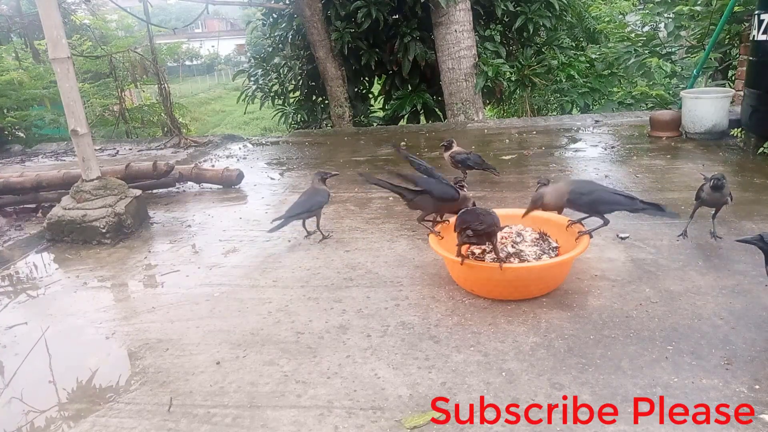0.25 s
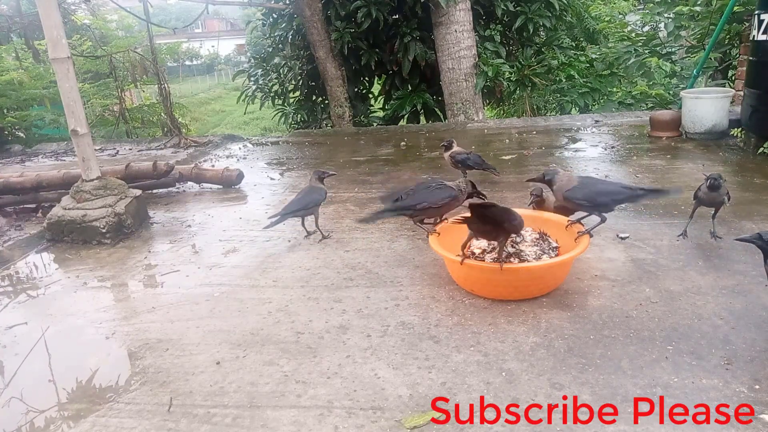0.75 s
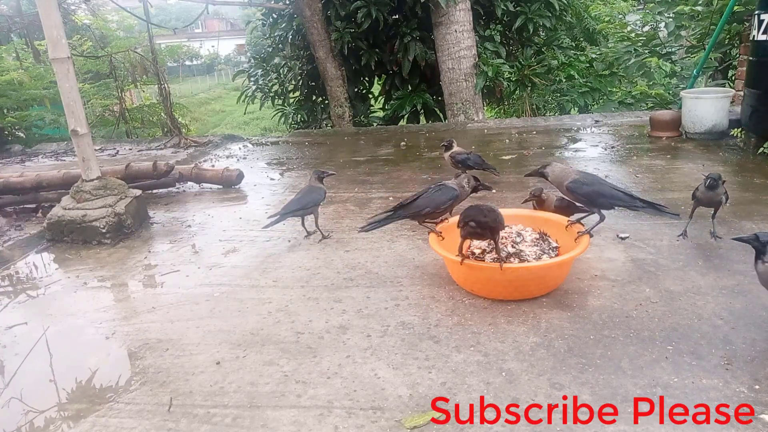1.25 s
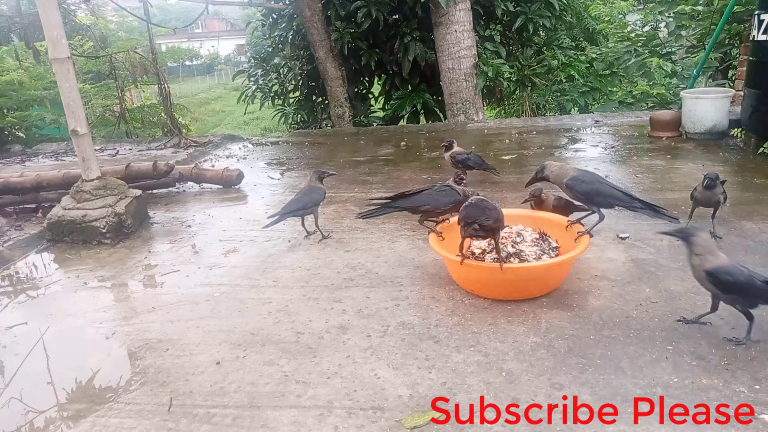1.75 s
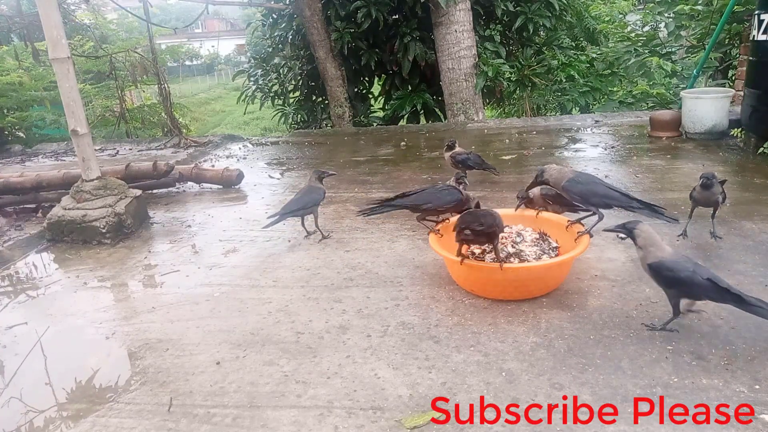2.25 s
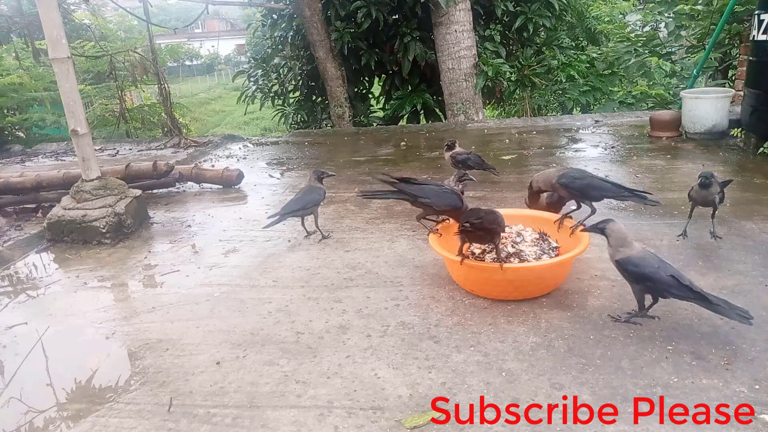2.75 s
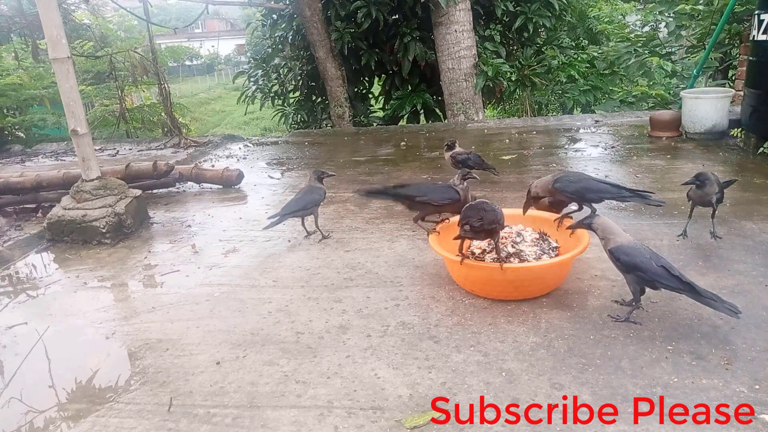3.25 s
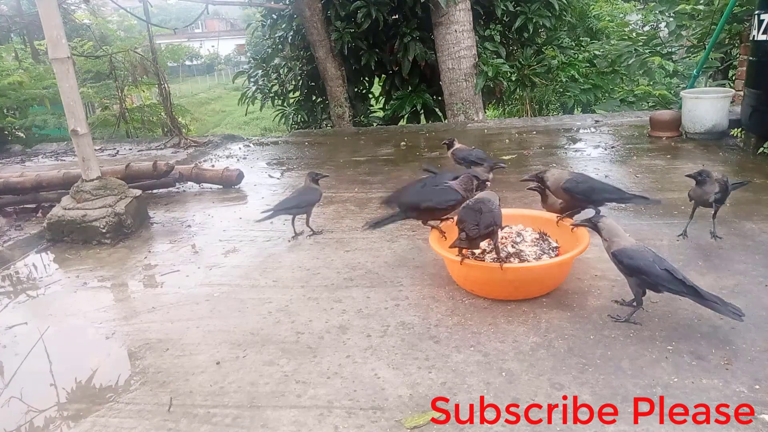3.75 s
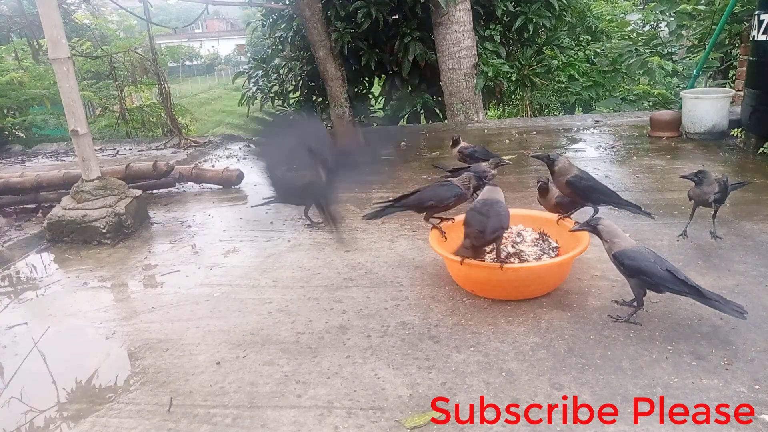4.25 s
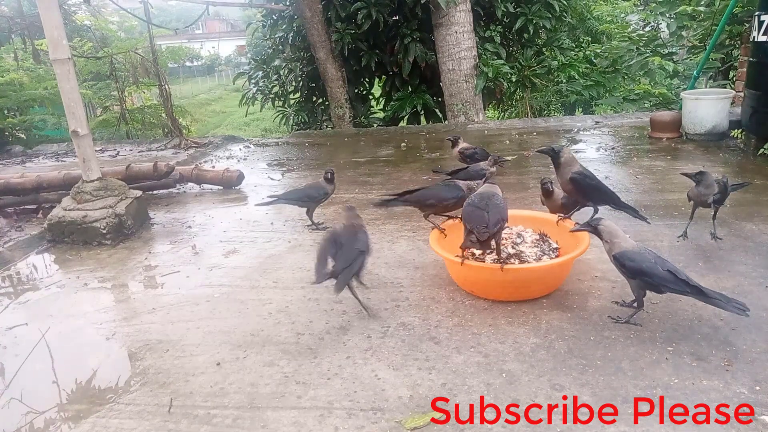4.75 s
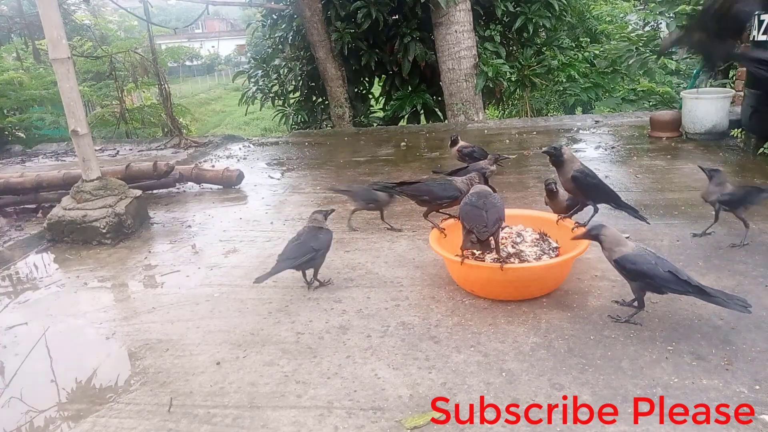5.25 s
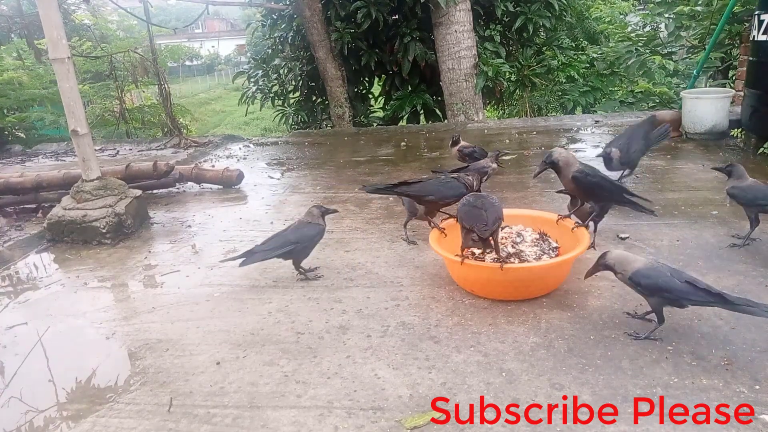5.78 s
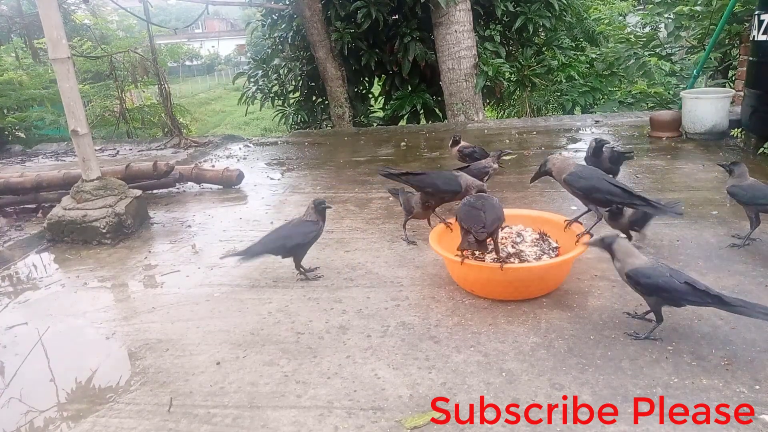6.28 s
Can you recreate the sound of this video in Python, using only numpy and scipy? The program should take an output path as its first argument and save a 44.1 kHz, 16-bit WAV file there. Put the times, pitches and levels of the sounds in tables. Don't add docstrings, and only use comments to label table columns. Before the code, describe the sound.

A small microphone sits close to crows feeding from a plastic basin in a wet, open yard. Soft leafy hush, far traffic, a very faint low motor hum and thin insect shimmer run throughout, with distant chirping. A far caw comes at 0.15 s, then at 0.55-1.05 s a loud, harsh near caw rises fast, holds and drops, its tone changing late as the head turns. A much quieter, duller caw answers at 1.3-1.7 s; a higher, tighter one at 2.5-2.8 s. Light beak and claw ticks scatter between, with a clear songbird note at 1.15 s. Sharp clacks and a scrape land at 3.6 s as wings swish about six times a second. From 4.6 to 5.1 s heavy low gusts thump and flutter on the microphone, then weaker puffs until about 5.8 s. Far caws recur, notably at 5.8 s; final small pecks fade into hush by 6.5 s.

```python
import sys
import numpy as np
from scipy import signal
from scipy.fft import rfft, irfft
from scipy.io import wavfile
from scipy.ndimage import uniform_filter1d

SR = 44100
rng = np.random.default_rng(int(sys.argv[2]) if len(sys.argv) > 2 else 0)


def waveform_to_disk(signal):
    frames = np.transpose(np.atleast_2d(signal))
    scaled = np.clip(frames, -1, 1) * 32767
    samples = np.round(scaled).astype(np.int16)
    wavfile.write(sys.argv[1], SR, samples)


def invert_db(x):
    u = np.asarray(x, float) / 20
    return 10 ** u


N = 287532

# (time [s], effort [dB], pitch [Hz], rasp [0-1])
LOUD_CAW = [(.55, -38.5, 257.7, 1), (.59, -22.5, 390, 0.9), (.655, -19.5, 490, 0.98),
            (.695, -18, 504.5, 0.68), (.785, -18.5, 498.1, 0.74), (.81, -19.5, 485.2, 0.7),
            (.868, -20.5, 481.9, 0.93), (.92, -21.5, 427.8, 0.4), (1.0, -24, 386.7, 0.32),
            (1.027, -33.5, 302.9, 1), (1.065, -72, 161.2, 0.77)]
DULL_CAW = [(1.265, -52, 370, 0.84), (1.29, -38.5, 422, 0.92), (1.35, -34, 464.8, 0.94),
            (1.45, -35.5, 450, 1), (1.54, -36.5, 402.8, 1), (1.66, -42.5, 349.7, 0.92),
            (1.69, -47, 317, 0.96), (1.71, -69, 315, 0.48)]
HIGH_CAW = [(2.482, -43, 332, 0.53), (2.506, -34, 462, 0.8), (2.535, -28.5, 568.7, 0.89),
            (2.59, -30, 573.5, 1), (2.62, -26, 560.3, 0.83), (2.665, -28.5, 548.8, 0.83),
            (2.7, -24.5, 513.3, 0.24), (2.724, -29, 502.3, 0.074), (2.741, -35, 495.4, 0.065),
            (2.778, -26, 466.6, 0.3), (2.79, -35.5, 450, 0.31), (2.81, -37.5, 368.5, 0.45),
            (2.834, -45.5, 290, 0.12)]
# (frequency [Hz], level [dB])
LOUD_THROAT = [(200, 4.5), (500, -13), (950, -37.5), (1150, -20.5), (1450, -10), (1720, -5), (2030, 3),
               (2400, 0), (2850, -16.5), (3100, -17.5), (3350, -27.5), (3700, -14), (4120, -15),
               (4900, -26), (5700, -19.5), (6300, -29), (7200, -28.5), (7900, -36.5), (8450, -33.5),
               (9300, -40.5), (10200, -39), (11000, -44), (15800, -46)]
DULL_THROAT = [(180, -64), (300, -9), (439, -41), (592, -42), (900, -17.5), (1120, -11), (1350, -11.5),
               (1600, -9.5), (1850, -6), (2060, -8.5), (2330, -3.5), (2700, -17.5), (3210, -29.5),
               (3790, -35.5), (4250, -40), (4750, -32), (5150, -36), (5600, -30.5), (6200, -36),
               (6800, -35.5), (7490, -37), (11300, -48), (15800, -57)]
HIGH_THROAT = [(180, -52), (300, -30), (527, 17), (747, -18), (1150, -11), (1630, -8), (1950, 8), (2250, 0),
               (2860, -19), (3430, -12), (4050, -39), (4650, -25.5), (5050, -29), (5500, -23), (6300, -29),
               (7050, -17.5), (7500, -23.5), (8000, -29), (10000, -33), (11500, -39), (15800, -46)]
FAR_THROAT = [(300, -45), (950, -7), (1500, -2), (1850, 7), (2100, 7), (2480, -1), (3000, -15), (3500, -17),
              (6000, -36), (11000, -48)]
ROUGHNESS = [.06, .05, .035]
SWINGS = [.095, .075, .058]
# (pitch [Hz], free rate [Hz])
THROB_LOCKS = [
    (494, 85.5),
    (600, 79.65),
    (562, 83.3),
]
# (frequency [Hz], level [dB])
BREATH_COLOUR = [(700, -32), (1500, -14), (3000, -13.5), (4300, 3.5), (6000, 13)]
# (frequency [Hz], change [dB])
NARROW_BEAK = [(2500, 0), (3900, -2), (5200, 0), (7200, 6), (8600, 4), (11000, 2)]
# (start [s], end [s])
BEAK_WIDENS_S = (.64, .7)
# (frequency [Hz], change [dB])
HEAD_TURN = [(1500, 3), (2000, 0.5), (2450, 4.5), (2900, 13), (3200, 4.5), (3550, -4.5), (4000, -14),
             (4900, 7), (7000, 2), (14500, 10)]
# (start [s], end [s])
HEAD_TURN_S = (.865, .9)
# (time [s], length [s], first pitch [Hz], top pitch [Hz], last pitch [Hz], level [dB])
FAR_CAWS = [(0.145, 0.16, 404.5, 451, 422, -56.5), (1.943, 0.6, 387, 408.7, 491.4, -59),
            (3.222, 0.24, 450, 534, 455, -56.5), (4.335, 0.28, 420, 478, 422, -60),
            (4.781, 0.19, 440, 489, 460, -58.5), (5.78, 0.22, 440, 515.5, 472.5, -54)]
# (time [s], peak [dB], ring [Hz], knock re ring [dB], fizz re ring [dB])
TICKS = [(.0462, -33, 1730, -21, -30), (.541, -37, 1400, -13, -40), (2.178, -48, 4350, -30, -30),
         (0.0299, -36, 3280, -13, -12), (0.0449, -26, 3750, -30, -35), (2.656, -39.5, 980, 2.5, -30),
         (1.156, -27.5, 3820, -35, -9), (1.1717, -32, 3930, -11.5, -6.5), (2.397, -37.5, 2620, -15, 0),
         (2.403, -34.5, 3030, -15, -6), (2.865, -46, 9300, -23, -8), (3.8492, -29.5, 4050, -27, -9),
         (3.879, -32, 3500, -17, -2), (4.4849, -41, 2500, -19, -2), (4.7533, -36, 3500, -12, -2),
         (5.3608, -39, 1190, -7, -6), (5.706, -47, 9000, -31, 6), (5.715, -51, 9000, -20, 2),
         (3.489, -42, 3920, 2.5, -30), (3.32, -41, 2130, -20, -30), (3.467, -28.5, 3520, -25, -33),
         (3.6103, -20, 3860, 3, -6), (3.622, -20.5, 1890, -1, -29), (3.7902, -33, 1970, -10, -38),
         (3.8857, -23, 2950, -34, -3.5), (4.7725, -30, 4170, -4, -8.5), (4.4923, -31.5, 2100, -21, 0),
         (2.603, -43.5, 910, 8, -30), (4.9112, -31, 1440, -5, -19), (5.1532, -26.5, 2150, -24, -8),
         (5.4077, -36.5, 910, 1.5, -20), (5.691, -48.5, 3700, -30, 10), (6.1521, -46, 1260, 5, 0),
         (6.2706, -45.5, 3340, 7.5, 5), (6.3904, -39.5, 3120, -9, 4), (6.408, -31.5, 3550, -23, -2),
         (6.4873, -34.5, 3340, 2.5, -0.5), (6.506, -32, 2210, -6, -7)]
# (time [s], level [dB], 60 dB decay [s])
SCUFFS = [(3.626, -37.5, 0.046), (4.462, -48, 0.14), (4.91, -47, 0.47), (5.153, -40, 0.28),
          (5.405, -49, 0.43), (3.32, -62, 0.075)]
# (first stroke [s], gap [s])
FLIGHTS = [(3.527, 0.1662), (4.898, 0.1663)]
STROKES_DB = [
    [-55, -55.5, -53.5, -55, -58, -58.5, -56.5, -56.5],
    [-54.5, -58.5, -53.5, -55.5, -56.5, -61],
]
# (frequency [Hz], level [dB])
FEATHERS = [(180, -43), (300, -3.5), (676, -11.5), (747, -8), (1040, -20), (1170, -19), (2630, -13),
            (4630, -20), (7010, -19.5), (9610, -29.5), (15800, -35.5)]
# (middle [s], level [dB], length [s])
GUSTS = [(4.55, -50, 0.06), (4.62, -31, 0.044), (4.68, -22.5, 0.17), (4.77, -21.5, 0.075),
         (4.84, -18.5, 0.061), (4.96, -18.5, 0.12), (5.025, -25.5, 0.041), (5.09, -34, 0.096),
         (5.235, -31.5, 0.082), (5.295, -27, 0.063), (5.38, -33, 0.091), (5.5, -31.5, 0.063),
         (5.56, -32, 0.036), (5.63, -34, 0.037), (5.75, -38.5, 0.15), (5.93, -53, 0.22),
         (6.155, -36.5, 0.054), (6.44, -48.5, 0.28)]
# (frequency [Hz], level [dB])
BUFFET = [(15, -48), (25, -35), (80, 7.5), (183, -3.5), (258, -22.5), (469, -46), (800, -59), (1200, -62),
          (1560, -81), (2640, -120)]
FLUTTER = [(60, -29), (150, 5.5), (300, -7.5), (500, -20.5), (900, -50), (2000, -96)]
# (time [s], peak [dB], frequency [Hz], polarity and scale)
THUMPS = [(1.246, -41, 84.6, 1), (3.286, -41, 326, .8), (2.149, -39, 370, 0.77), (3.268, -35.5, 71.4, 0.62),
          (4.602, -31, 250, 0.84), (4.756, -21, 257, 0.67), (4.667, -13, 197, 0.76),
          (4.711, -21, 296, -1.13), (4.768, -22.5, 200, 0.95), (4.813, -9.5, 202, -0.82),
          (4.832, -3, 139, -0.56), (4.916, -12, 170, -0.62), (4.945, -4, 315, 0.51), (5.036, -8, 180, 0.62),
          (5.292, -19, 146, 0.9)]
# (time [s], length [s], first pitch [Hz], last pitch [Hz], level [dB])
CHIRPS = [(.48, .066, 3030, 3130, -58), (.45, .04, 3300, 3900, -60), (.475, .075, 3850, 3860, -63),
          (.22, .09, 2720, 2700, -63), (.4, .05, 2550, 2700, -64), (1.147, .046, 2885, 2975, -36.5),
          (1.19, .075, 2957, 2910, -51), (1.755, .04, 3510, 3450, -59), (2.04, .06, 3300, 4600, -62),
          (2.121, .052, 3270, 3030, -58), (2.23, .05, 4800, 3900, -63), (2.275, .035, 3450, 3050, -57),
          (2.314, .095, 2730, 2600, -61), (3.555, .062, 2720, 2900, -51), (3.661, .025, 2380, 2300, -49),
          (3.794, .04, 1944, 1734, -52.5), (3.83, .059, 2450, 3160, -41.5), (3.82, .02, 1750, 2500, -51),
          (3.902, .098, 2950, 1940, -54), (3.996, .07, 1980, 2070, -59), (4.092, .09, 2600, 3190, -61),
          (4.235, .05, 4300, 4270, -65), (4.29, .2, 4190, 4260, -57), (4.49, .14, 4250, 4190, -62),
          (4.329, .053, 2450, 3150, -61), (4.584, .028, 2255, 2860, -59), (4.57, .09, 2250, 2330, -64),
          (4.627, .1, 2960, 2920, -60), (4.664, .085, 2680, 2290, -61), (4.767, .05, 3064, 2950, -57),
          (4.83, .035, 2950, 2850, -60), (4.84, .05, 3740, 3660, -61), (4.91, .022, 1545, 1400, -49),
          (4.973, .035, 3610, 3300, -60), (5.0, .09, 4270, 4280, -60), (3.145, .04, 3480, 3450, -62),
          (5.09, .07, 4270, 4220, -63), (5.304, .047, 3510, 3100, -54), (5.468, .044, 2360, 2690, -63),
          (5.66, .06, 3300, 3750, -62), (5.769, .045, 2400, 2850, -59), (5.82, .04, 2850, 3350, -63),
          (5.99, .07, 3500, 3450, -65)]
# (frequency [Hz], level [dB])
HUSH_COLOUR = [(15, -53), (25, -44), (102, 1), (170, -11), (205, -6.5), (228, -8.5), (486, -15),
               (672, -19.5), (1320, -21), (2150, -20), (3580, -21.5), (4210, -28.5), (4700, -28),
               (5300, -25), (8970, -39.5), (15800, -35)]
# (time [s], change [dB])
BREEZE = [(0, 0), (.4, -1.5), (1.1, 1), (1.8, -1), (2.2, 1), (2.9, -0.5), (3.1, -2.5), (3.401, 1), (3.9, 3),
          (4.2, 0.5), (4.6, 4.5), (5.2, 1), (5.6, -1), (6.0, -1), (6.52, 0)]
# (frequency [Hz], rms [dB])
HUM = [(102.3, -67.5), (204.6, -62), (333.8, -93)]
# (frequency [Hz], width [Hz], level [dB], throb rate [Hz], throb depth [dB])
INSECTS = [(5530, 204, -72.5, 11, 3), (8840, 600, -77, 3., 0.4)]
# (frequency [Hz], level [dB])
MICROPHONE = [(20, -11.5), (60, 0.5), (4300, 1.5), (5000, -2.5), (5600, -3.5), (6300, -2), (7200, 6),
              (8200, 2.5), (11000, 3.5), (12800, 3.5), (14500, 12), (15500, 12), (15750, -57), (22050, -70)]


def evened(x):
    return x / np.sqrt(np.mean(x ** 2) + 1e-20)


def read(points, hz):
    f, value = np.transpose(points)
    return np.interp(np.log(hz + 1), np.log(f + 1), value)


def add(mix, s, sound):
    part = mix[max(round(s * SR), 0):][:len(sound)]
    part += sound[:len(part)]


def coloured(x, spectrum):
    gain = invert_db(read(spectrum, np.fft.rfftfreq(len(x), 1 / SR)))
    return evened(irfft(rfft(x) * gain, len(x)))


def wander(size, hz):
    lowpass = signal.butter(2, min(hz / (SR / 2), .9))
    return evened(signal.lfilter(*lowpass, rng.standard_normal(size + 4000))[4000:])


def lumps(rows):
    t = np.arange(N) / SR
    return sum(invert_db(db) * np.exp(-((t - s) / (0.5 * length)) ** 2) for s, db, length in rows)


def caw(rows, throat, count_locked, lock, rough_top, odd_db, mouth_open=0.98, swing=0.15, first_db=-9.0,
        second_db=-1.5, breath_db=0.5, sag_db=19.5, pulse=0.48, patchy_db=3.5, count=36):
    s, *columns = np.transpose(rows)
    t = np.arange(s[0], s[-1], 1 / SR)
    size = len(t)
    effort_db, hz, rasp = (np.interp(t, s, c) for c in columns)
    turned = np.interp(t, [*HEAD_TURN_S, 1.1, 1.2], [0, 1, 1, 0])
    opening = np.interp(t, [.5, .55, *BEAK_WIDENS_S], [0, 1, 1, 0])

    falling = np.where(t > t[hz.argmax()], 1, .45)
    under_db = effort_db.max() - effort_db
    lock_hz, free_hz = lock
    locked = hz > lock_hz
    slack = np.minimum(under_db / 16, 1) ** 2
    rough = rough_top * rasp * (2 - locked) + .15 * slack + 0.2 * turned
    mouth = mouth_open - .01 * np.maximum(under_db - 8.5, 0)

    hz = hz * (1 + .03 * rough * wander(size, 35.3))
    throb = 2 * np.pi * np.cumsum(np.where(locked, hz / count_locked, free_hz)) / SR
    shake = hz * rasp * swing * (np.sin(throb) + 0.14 * np.cos(2 * throb + 0.19))
    hz = hz * (1 + .04 * (rough + .012) * wander(size, 360))
    turns, shaken = np.cumsum(hz) / SR, np.cumsum(shake) / SR

    tone = np.zeros(size)
    for k in range(1, count):
        shimmer = 1 + (rough + .007 * k) * wander(size, 210)
        high = k / 7
        follows = k / np.sqrt(1 + high ** 4.2)
        level_db = read(throat, (k * hz + follows * shake) / mouth) + first_db * (k == 1)
        level_db += turned * read(HEAD_TURN, k * hz) + opening * read(NARROW_BEAK, k * hz)
        level_db += odd_db * rasp * (k % 2) / (1 + high ** 4)
        level_db -= 2 * np.maximum(k * hz - 10000, 0) / 1000
        level_db += patchy_db * rasp * wander(size, 22)
        if k == 2:
            level_db += second_db + sag_db * falling * np.minimum(np.log2(500 / hz), .45)
            shimmer *= 1 + pulse * rasp * np.cos(throb + 5.26)
        phase = 2 * np.pi * (k * turns + follows * shaken) + k * k * 0.44
        tone += invert_db(level_db) * shimmer * np.cos(phase)

    puffs = (1.0 + np.cos(np.pi * turns) ** 2) * rng.standard_normal(size)
    breath = coloured(coloured(puffs, throat), BREATH_COLOUR)
    breath += opening * (coloured(breath, NARROW_BEAK) - breath)
    voice = evened(tone) + invert_db(breath_db - 0.26 * under_db) * (.14 + 2.2 * rough) * breath
    voice *= 1 + 0.25 * rasp * np.cos(throb + .5)
    voice /= np.sqrt(uniform_filter1d(voice ** 2, 1600) + 1e-9)
    return s[0], invert_db(effort_db) * voice * signal.windows.tukey(size, .03)


def far_caw(s, length, first_hz, top_hz, last_hz, db):
    rasp = .65
    rows = [(s, db - 5.5, first_hz, rasp),
            (s + .27 * length, db, top_hz, rasp),
            (s + .8 * length, db - 1.5, (top_hz + last_hz) / 2, rasp),
            (s + length, db - 5.5, last_hz, rasp)]
    return caw(rows, FAR_THROAT, 6.3, THROB_LOCKS[1], .12, -3., mouth_open=(top_hz + last_hz) / 980,
               swing=.075, breath_db=-5., count=12)


def tick(s, db, ring_hz, knock_db, fizz_db):
    t = np.arange(round(.15 * SR)) / SR

    def mode(hz, t60):
        return np.sin(2 * np.pi * hz * t) * invert_db(-60 * t / t60)

    ring = mode(ring_hz, 0.0091)
    knock = invert_db(knock_db) * (mode(520, 0.035) + mode(300, 0.011) + 0.45 * mode(395, 0.047))
    noise = rng.standard_normal((2, len(t)))
    fizz = coloured(noise[0], [(4000, -8.5), (8000, -11.5), (16000, -24.5)])
    fizz *= invert_db(fizz_db - 60 * t / 0.012)
    grit = coloured(noise[1], [(300, -1.0), (800, -2.0), (3500, 0.0), (7000, -10.0), (16000, -32.5)])
    grit *= 0.22 * invert_db(-60 * t / 0.052)
    return s, invert_db(db - 2.5) * (ring + knock + fizz + grit) * np.minimum(t / 0.0013, 1)


def scuff(s, db, t60):
    t = np.arange(round(.3 * SR)) / SR
    grit = rng.standard_normal(len(t)) * invert_db(1.2 * wander(len(t), 130))
    colour = [(300, 4.5), (700, 5.5), (2500, -2.5), (4000, -10.5), (6000, -51), (16000, -29)]
    return s, invert_db(db - 60 * t / t60) * coloured(grit, colour)


def wings():
    strokes = []
    for (s, gap), strokes_db in zip(FLIGHTS, STROKES_DB):
        strokes += [(s + k * gap, db, 0.13) for k, db in enumerate(strokes_db)]
    rush = coloured(rng.standard_normal(N), FEATHERS)
    return lumps(strokes) * rush * invert_db(1.9 * wander(N, 67))


def wind():
    gust = lumps(GUSTS) * invert_db(2.0 * np.clip(wander(N, 32.0), -3, 1.3))
    out = invert_db(-3.5) * gust * coloured(rng.standard_normal(N), BUFFET)
    out += invert_db(8.0) * gust ** 1.795 * coloured(rng.standard_normal(N), FLUTTER)
    for s, db, hz, sign in THUMPS:
        u = np.arange(-.02, .02, 1 / SR) * hz * np.pi
        add(out, s - .02, sign * invert_db(db) * (1 - 2 * u ** 2) * np.exp(-u ** 2))
    return out


def chirp(s, length, first_hz, last_hz, db):
    size = round(length * SR)
    smear_hz = 40 + .1 * abs(last_hz - first_hz)
    whistle = np.exp(2j * np.pi * np.cumsum(np.linspace(first_hz, last_hz, size)) / SR)
    blur = 1.2 + wander(size, smear_hz) + 1j * wander(size, smear_hz)
    return s, invert_db(db) * evened((whistle * blur).real) * signal.windows.tukey(size, .4)


def chatter():
    out = np.zeros(N)
    for when, pitch, glide, length, level in rng.random((120, 5)):
        hz = 2300 + 1400 * pitch
        last_hz = hz * (.85 + .3 * glide)
        add(out, *chirp(when * N / SR, .03 + .07 * length, hz, last_hz, -77. + 4. * level))
    return out


def yard(x):
    at = np.arange(400, SR // 2, 20)
    walls = invert_db(-60 * at / SR / 0.15)
    trees = invert_db(-22 - 60 * at / SR / 0.75)
    taps = np.zeros(SR // 2 + 20)
    taps[at + rng.integers(0, 20, len(at))] = rng.choice([-1., 1.], len(at)) * (walls + trees)
    taps = coloured(taps, [(300, -6.5), (1500, 1.0), (3000, -0.5), (8000, 0), (16000, -13.5)])
    return signal.fftconvolve(x, taps / np.linalg.norm(taps))[:N]


def hush():
    frames, hz = N // 256 + 5, np.fft.rfftfreq(1024, 1 / SR)
    a, b, patches, drifts = rng.standard_normal((frames, 513, 4)).T
    drifts = evened(uniform_filter1d(uniform_filter1d(drifts, 40, 0), 45, 1))
    drifts *= (hz > 3800)[:, None]
    patches = evened(uniform_filter1d(uniform_filter1d(patches, 10, 0), 14, 1))
    colour_db = read(HUSH_COLOUR, hz) - 21. * (hz > 10900)
    z = (a + 1j * b) * invert_db(colour_db[:, None] + 0.89 * patches + 1.1 * drifts)
    noise = evened(signal.istft(z, nperseg=1024, noverlap=768)[1][:N])
    return invert_db(-57.5 + np.interp(np.arange(N) / SR, *np.transpose(BREEZE))) * noise


def motor_hum():
    shaft = np.cumsum(1 + 0.012 * wander(N, 2.94)) / SR
    out = np.zeros(N)
    for hz, db in HUM:
        out += np.sqrt(2) * invert_db(db + 2.2 * wander(N, 5.5)) * np.sin(2 * np.pi * hz * shaft)
    return out


def insects():
    out = np.zeros(N)
    for hz, width, db, rate, throb_db in INSECTS:
        band = [(hz - 3 * width, -40), (hz - width / 2, 0), (hz + width / 2, 0), (hz + 3 * width, -40)]
        out += invert_db(db + throb_db * wander(N, rate)) * coloured(rng.standard_normal(N), band)
    return out


def scene():
    near, far = np.zeros(N), chatter()
    add(near, *caw(LOUD_CAW, LOUD_THROAT, count_locked=6, lock=THROB_LOCKS[0], rough_top=ROUGHNESS[0],
                   odd_db=-2.0, mouth_open=0.98, swing=SWINGS[0], first_db=-20.5, second_db=6.0,
                   breath_db=-20, pulse=0.31, patchy_db=1.5))
    add(near, *caw(DULL_CAW, DULL_THROAT, count_locked=6, lock=THROB_LOCKS[1], rough_top=ROUGHNESS[1],
                   odd_db=-7.0, mouth_open=0.96, swing=SWINGS[1], first_db=-2.0, second_db=-2.0,
                   breath_db=-20, pulse=0.28, patchy_db=2.0))
    add(near, *caw(HIGH_CAW, HIGH_THROAT, count_locked=7, lock=THROB_LOCKS[2], rough_top=ROUGHNESS[2],
                   odd_db=-17.5, mouth_open=1.0, swing=SWINGS[2], first_db=-39.5, second_db=3.5,
                   breath_db=-12, pulse=0.87, patchy_db=1.5))
    for mix, source, rows in [(near, tick, TICKS), (near, scuff, SCUFFS),
                              (far, far_caw, FAR_CAWS), (far, chirp, CHIRPS)]:
        for row in rows:
            add(mix, *source(*row))
    echoes = yard(invert_db(-12) * near + invert_db(-8.5) * far)
    return (near + far + echoes + wings() + wind() + hush() + motor_hum() + insects())[None]


def roll_off(x):
    return signal.sosfilt(signal.butter(12, 16560, fs=SR, output="sos"), x)


def record(dry):
    colour = invert_db(read(MICROPHONE, np.fft.rfftfreq(N, 1 / SR)))
    mix = irfft(rfft(dry) * colour, N)
    return roll_off(mix)


dry = scene()
out = record(dry)
waveform_to_disk(out)
```